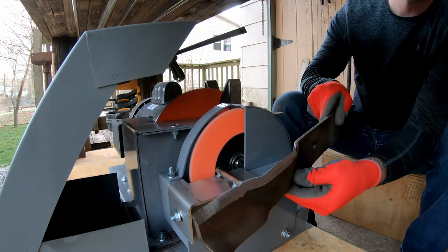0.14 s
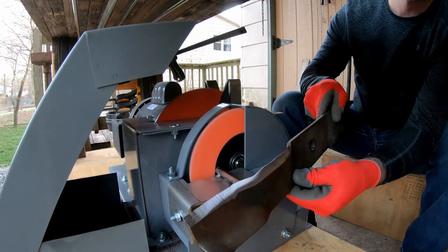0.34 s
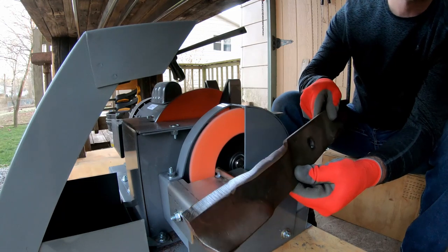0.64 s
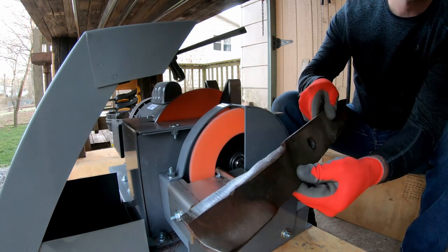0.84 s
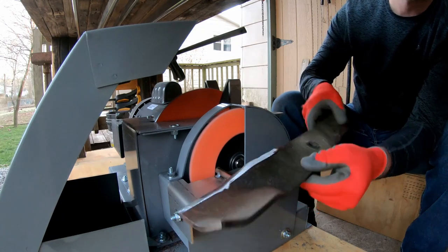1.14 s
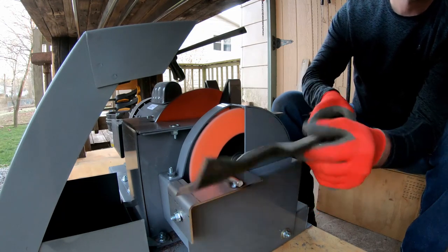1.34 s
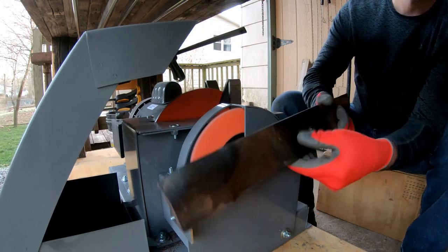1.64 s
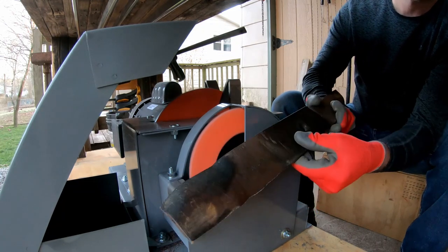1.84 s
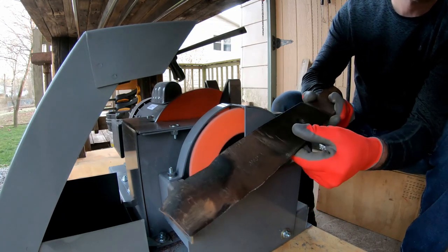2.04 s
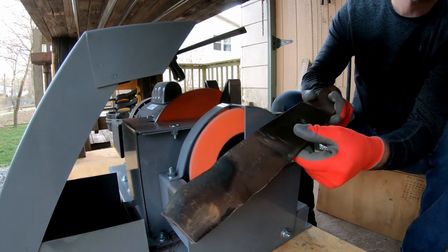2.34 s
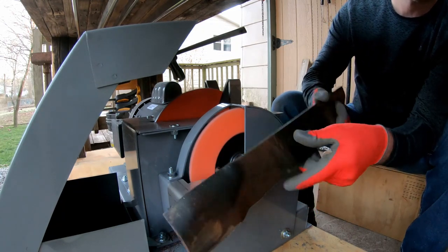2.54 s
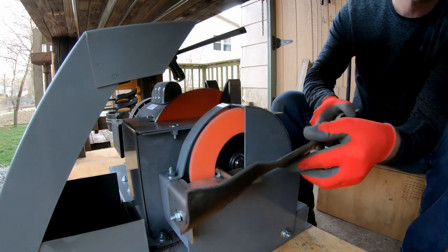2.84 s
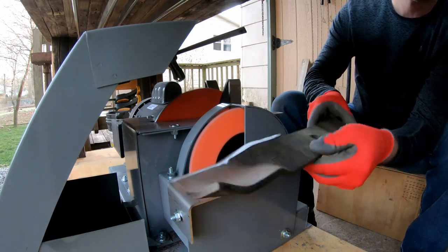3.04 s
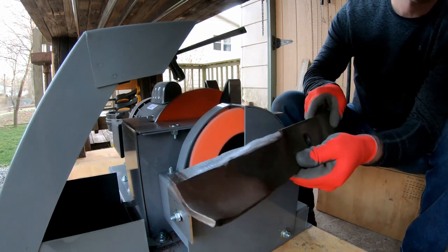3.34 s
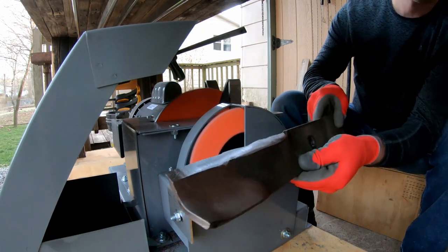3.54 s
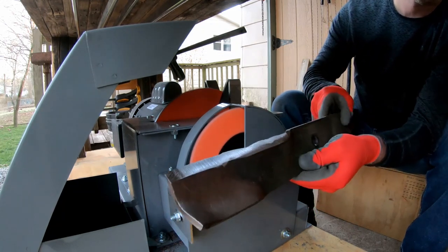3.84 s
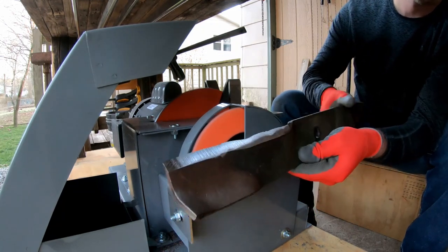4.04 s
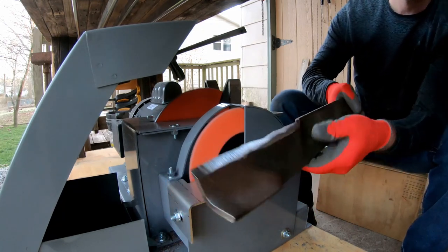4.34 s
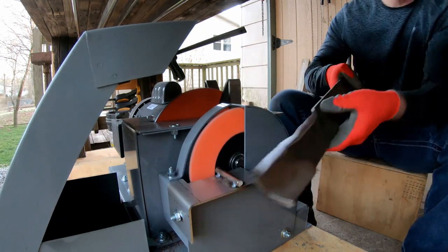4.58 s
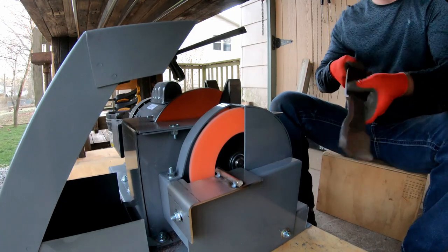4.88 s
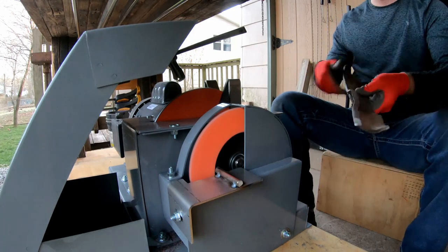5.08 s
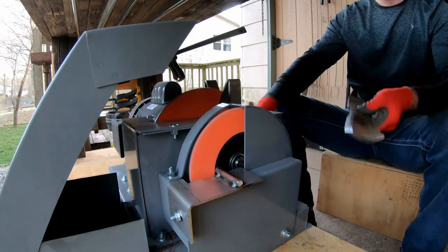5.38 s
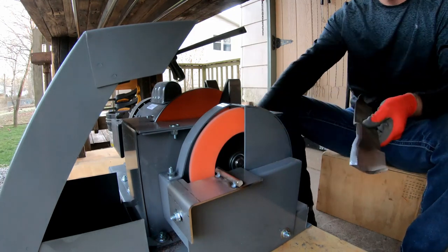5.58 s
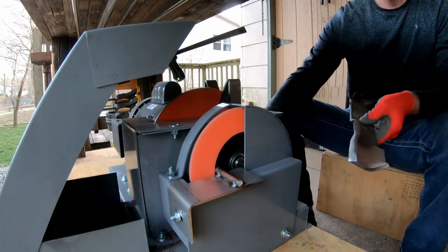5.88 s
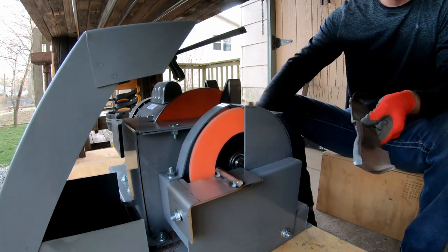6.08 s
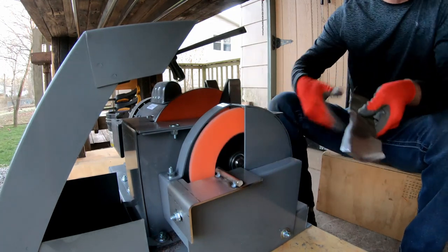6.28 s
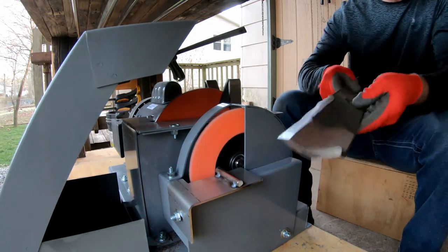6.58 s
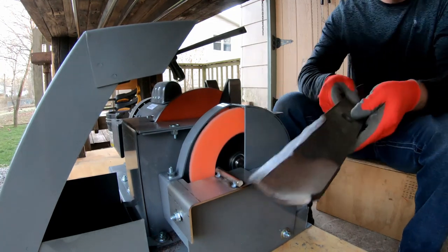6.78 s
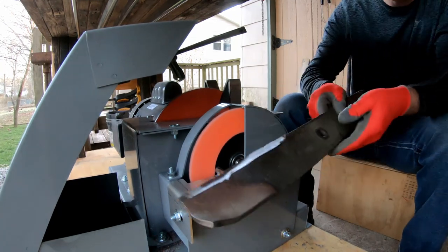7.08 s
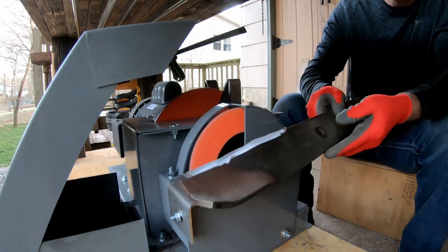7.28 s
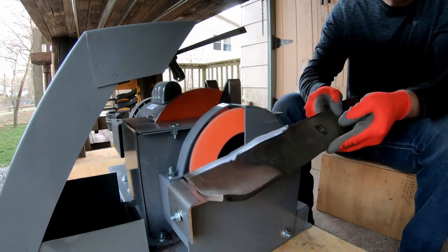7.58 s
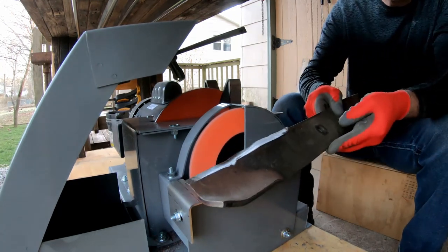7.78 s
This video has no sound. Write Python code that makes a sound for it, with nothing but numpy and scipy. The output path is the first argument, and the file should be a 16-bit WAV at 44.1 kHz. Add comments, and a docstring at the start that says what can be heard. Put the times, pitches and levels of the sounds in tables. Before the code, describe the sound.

A bench grinder idles close by under an open shed, its motor giving a steady, gently swelling hum over a soft fan whir. A loose part ticks rapidly against the metal guard. About six seconds in, a switch snaps off and the hum dies away. The wheel keeps coasting, slowing slightly, with a low shudder from the stand, louder metallic ticking and dull knocks from the housing.

```python
"""Under an open shed, a bench grinder idles close by. Its four-pole motor hums on multiples of the
shaft speed, which swell with the slip against the mains; a loose part ticks on the guard once a turn.
The switch snaps off and the hum dies. The unbalanced wheel coasts, shakes the stand and makes the
housing knock. Fan and bearings whir behind it all."""
import sys
import numpy as np
from scipy import signal
from scipy.fft import rfft, irfft
from scipy.io import wavfile
from scipy.ndimage import uniform_filter1d

SR = 44100
rng = np.random.default_rng(int(sys.argv[2]) if len(sys.argv) > 2 else 0)


def waveform_to_disk(signal):
    """Save audio, clipped to [-1, 1], as 16-bit WAV at the path in sys.argv[1]."""
    frames = np.transpose(np.atleast_2d(signal))
    scaled = np.clip(frames, -1, 1) * 32767
    samples = np.round(scaled).astype(np.int16)
    wavfile.write(sys.argv[1], SR, samples)


N = 349272
T = np.arange(N) / SR
F = np.maximum(np.arange(N // 2 + 1) * SR / N, 1)
SLIP_HZ = 0.374  # twice the mains minus four times the shaft speed
POWER_OFF_S = 5.95

# Shaft speed: t/s, speed/Hz
SHAFT_SPEED = [(0, 29.909), (5.907, 29.909), (6.38, 28.943), (7.92, 26.259)]
def shaft():
    """Shaft angle in turns: steady under power, then slowing."""
    return np.cumsum(curves(SHAFT_SPEED)[0]) / SR - 1 / 8

# Hum lines: shaft order, offset/slip steps
HUM_LINES = [(1, 0), (2, 0), (3, 0), (4, 1), (5, 1), (6, 1), (7, 1), (8, 1), (9, 1), (10, 1), (11, 1),
             (12, 1), (13, 1), (14, 3), (15, 1), (16, 3), (17, 2), (20, 4), (23, 4), (34, 4), (35, 0)]
# Swell of each hum line: level/dB, depth, loudest at t/s
HUM_SWELLS = [(-65, .17, 2.15), (-59, 0.4, 2.1), (-64.5, 1, 0.29), (-52.5, 0.1, 0.28), (-50.5, 0.21, 0.033),
              (-31, 0.07, 1.1), (-46.5, 0.6, 1.61), (-42.5, 0.54, 0.91), (-53, 1.4, 1.1),
              (-52, 0.55, 0.092), (-54.5, 0.91, 0.22), (-63.5, 1.3, 0.42), (-64, 1.2, 0.55),
              (-68, 0.4, 2.8), (-84, 0.5, 2.5), (-71.5, 0, 2.3), (-71.5, 0, 1), (-69, 1.2, 0.92),
              (-70, 0.92, 2.7), (-75.5, 0.8, 0.87), (-75.5, 1.65, 2.57)]
def motor_hum(turn, stand_hz=185, stand_width_hz=33, frame_lag_cycles=0.24, off_t60_s=0.75):
    """Each line beats with a neighbour one slip step up (two at order 10); stand and frame delay it."""
    decimation = 8
    t, turn = T[::decimation], turn[::decimation]
    out = 0
    for (order, steps), (db, depth, loud_s) in zip(HUM_LINES, HUM_SWELLS):
        hz = order * SHAFT_SPEED[0][1]
        beat_hz = SLIP_HZ * (2 if order == 10 else 1)
        swell = 1 + depth * np.exp(2j * np.pi * beat_hz * (t - loud_s))
        lag = np.arctan2(1, (stand_hz - hz) / stand_width_hz)
        lag += 2 * np.pi * frame_lag_cycles * (order % 4 > 0)  # every fourth order is magnetic pull
        phase = 2 * np.pi * (order * (turn - 0.5) + steps * SLIP_HZ * t) - lag
        out = out + through_bench(undb(db) * swell * np.exp(1j * phase), hz)
    out = signal.resample_poly(out, decimation, 1, axis=1, padtype="line")[:, :N]
    return out * undb(-60 * np.maximum(T - POWER_OFF_S, 0) / off_t60_s)

# Wheel lines: shaft order
WHEEL_ORDERS = [1, 2, 3, 5, 6, 7, 8, 9, 11]
# Each wheel line before the stand's lift: level/dB, drift/(dB/s), rise per unit shudder/dB
WHEEL_LEVELS = [(-58, -10, -8), (-54, 1.5, 1.5), (-51.5, -3, 11), (-59, 3, 10), (-51, -4.5, 1.5),
                (-58.5, 4, 8.5), (-55.5, 1, 13.5), (-58, 0, 0), (-65, 5.5, 10)]
# Stand resonances: f/Hz, width/Hz, gain/dB
STAND_RESONANCES = [(170.1, 5.6, 9.5), (253.6, 2.5, 10), (250, 2.1, 11.5), (306.1, 8.1, 10), (288, 5.3, -2)]
# Stand shudder: t/s, strength (negative = slack)
STAND_SHUDDER = [(6.55, 0.13), (6.9, 0.45), (7.08, 0.67), (7.2, 0.35), (7.32, -0.65), (7.55, -0.29)]
def coasting_wheel(turn, waver_db_per_s=1.2, onset_s=0.058):
    """The unbalanced wheel sweeps its multiples down through the stand's resonances."""
    coast = T > POWER_OFF_S
    since = T[coast] - POWER_OFF_S
    speed, shudder = curves(SHAFT_SPEED)[0][coast], curves(STAND_SHUDDER)[0][coast]
    onset = np.minimum(since / onset_s, 1)
    out = np.zeros((2, N))
    for order, (db, drift, rise_db) in zip(WHEEL_ORDERS, WHEEL_LEVELS):
        waver_db = waver_db_per_s * since * walk(9)[coast]
        size = undb(db + drift * since + rise_db * shudder + waver_db)
        size *= resonance_gain(order * speed, STAND_RESONANCES)
        line = size * np.exp(2j * np.pi * (order * turn[coast] + rng.random()))
        out[:, coast] += through_bench(line, order * SHAFT_SPEED[2][1]) * onset
    return out

# Bench path, right against left: f/Hz, gain/dB, lag/rad
BENCH_PATH = [(30, 8, -.32), (60, 0, -.48), (90, 9.5, 1.06), (120, -1.3, -.05), (150, .3, -.07),
              (180, -.6, -.04), (240, -.4, 0), (300, .8, -.04), (330, .7, 0), (420, -4.5, 0), (600, 0, -.3),
              (700, 3.3, .45), (1050, 4.5, .14)]
def through_bench(line, hz):
    """A complex line in stereo; the lowest lines reach the right side through the bench."""
    path_hz, db, lag = np.transpose(BENCH_PATH)
    right = undb(np.interp(hz, path_hz, db)) * np.exp(-1j * np.interp(hz, path_hz, lag))
    return np.sqrt(8) / (1 + right.real) * np.array([line.real, (line * right).real])

# Pressure of the loose part, repeating each slip cycle: t/s, pressure 0-1
CONTACT_PRESSURE = [(2.2, 0.46), (2.5, 0.04), (3.0, 0.47), (3.5, 0.51), (4.15, 1), (4.75, 0.88)]
# Rim, body, edge, hiss: unpressed level/dB, rise at full pressure/dB, coasting offset/dB
GUARD_LEVELS = [(-92, 22, -21), (-70.5, 9, 0), (-78, 15, 0), (-98, 17, -16)]
# Coasting contact: t/s, body level/dB, edge level/dB, length/turns
COAST_CONTACT = [(5.96, -66, -85, 0.019), (6.27, -76.5, -88, .03), (6.4, -59.5, -59.5, .018),
                 (6.55, -54, -60.5, .014), (6.9, -53, -60.5, .03), (7.15, -55, -66.5, .04),
                 (7.3, -62, -69.5, .045), (7.6, -61, -69, .055), (7.92, -59, -69, .065)]
def contact(powered_length_turns=0.033):
    """The part leans in and lets go under power. Gives dB of pip, rim, body, edge, hiss, and length."""
    pressure = np.interp(T, *np.transpose(CONTACT_PRESSURE), period=1 / SLIP_HZ)
    body_db, edge_db, length = curves(COAST_CONTACT)
    powered = T < COAST_CONTACT[0][0]
    pip_db = np.where(powered, -70.5 + 6 * slip_swell(loud_s=2.72), np.interp(T, (6.4, 6.7), (-66, -71)))
    levels = [pip_db]
    for (db, rise_db, offset_db), coast_db in zip(GUARD_LEVELS, (body_db, body_db, edge_db, edge_db)):
        levels.append(np.where(powered, db + rise_db * pressure, coast_db + offset_db))
    return levels, np.where(powered, powered_length_turns, length)

POWERED_TICK_TURNS, COAST_TICK_TURNS = -0.02, 0.51
# Housing pip and guard rim: f/Hz, t60/s
PIP_AND_RIM = [(2000, 0.049), (4217, 0.2)]
# Guard body and edge modes: f/Hz, t60/s, powered level/dB, coasting level/dB, late level/dB
BODY_MODES = [(1478, 0.048, -8.5, -0.5, 3), (1450, 0.017, -12, -12.5, 0), (1776, 0.076, -12, -13.5, -5),
              (2254, 0.094, 0, -14.5, -2), (2464, 0.035, 3, -1.5, 2.5), (2667, 0.039, 0.5, -10, -11.5),
              (3090, 0.021, -20.5, -1.5, -13.5), (3193, 0.035, 0, 4, -2), (3314, 0.022, -5.5, -4.5, 6),
              (3450, 0.034, -19.5, -9.5, -1)]
EDGE_MODES = [(4600, 0.018, -14, -16.5, -13), (4794, 0.024, -6.5, -14, -5), (5014, 0.027, -4, -6, -13),
              (5480, 0.024, -4, -12.5, -9), (5834, 0.018, -4, -12, -5), (6220, 0.0037, -1, 0.5, 2.5),
              (6310, 0.016, -6.5, -2, 1), (7060, 0.013, -3.5, -7.5, -1.5), (7700, 0.018, -9, -10.5, -6.5),
              (8560, 0.024, -13, -10, -5.5), (8970, 0.015, -4.5, -10, -15.5)]
def guard_ticks(turn, shift_s=6.3, creep_s=(7.05, 7.4)):
    """A loose part rings housing and guard once a turn; coasting, it touches elsewhere, then creeps."""
    levels, length = contact()
    angle = turn - np.where(T < shift_s, POWERED_TICK_TURNS, COAST_TICK_TURNS)
    late = np.interp(T, creep_s, [0, 1])
    hit = scrape(angle, length)

    def struck(modes):
        """Modes weighted for where the part touches."""
        out = 0
        for hz, t60, powered_db, coast_db, late_db in modes:
            db = np.where(T < shift_s, powered_db, coast_db + late * (late_db - coast_db))
            out = out + ring(hit, hz, t60) * np.sqrt(t60) * undb(db)
        return unit(out)

    hiss = bandpass([hit, scrape(angle, length)], (10000, 15200), order=3)
    hiss = undb(0.5 * late) * np.array([unit(side) for side in hiss])
    edge_rasp = bandpass([hit, 0.2 * hit + scrape(angle, length)], (1300, 9600), order=4)
    edge = struck(EDGE_MODES) + undb(-14 + 0.5 * late) * unit(edge_rasp)
    body_rasp = bandpass(scrape(angle, 2.1 * length), (1300, 3900), order=2)
    body = struck(BODY_MODES) + late * undb(-1.5) * unit(body_rasp)
    pip, rim = [ring(tap(angle + 0.0411, scatter_db=1.5), hz, t60) for hz, t60 in PIP_AND_RIM]
    # a faint touch ahead of the late ticks
    graze = ring(tap(angle + 0.214, scatter_db=1.3), hz=5480, t60=0.012, rise=0.33)
    graze *= undb(-73) * np.interp(T, (6.75, 6.9), [0, 1])
    return graze + sum(undb(db) * part for db, part in zip(levels, (pip, rim, body, edge, hiss)))

def scrape(angle, length, scatter_db=-0.5, fresh_grit=0.39):
    """One scrape a turn over much the same roughness; its energy is independent of its length."""
    angle = angle + 2.6 * length
    count, past = np.floor(angle).astype(int) + 2, angle % 1
    size = undb(scatter_db * rng.standard_normal(count.max() + 1))[count]
    surface = rng.standard_normal(1500)[(past * 1500).astype(int)]
    grit = surface + fresh_grit * rng.standard_normal(N)
    return size * grit * (past / length) ** 2 * np.exp(-past / length) / np.sqrt(length)

def tap(angle, scatter_db):
    """One clean blow a turn, of uneven strength."""
    count = np.floor(angle).astype(int) + 2
    size = undb(scatter_db * rng.standard_normal(count.max() + 1))[count]
    return size * (np.diff(count, prepend=count[0]) == 1)

# Switch contacts and bounces: t/s, relative level/dB
SWITCH_SNAPS = [(5.906, 14), (5.908, -2), (5.912, -13), (5.916, 12), (5.92, -3), (5.923, -7), (5.934, -5),
                (5.942, 0)]
# Switch box modes: f/Hz, t60/s, relative level/dB
BOX_MODES = [(990, 0.027, -12), (1320, 0.0065, 7.5), (1770, 0.0053, -12), (2190, 0.0064, 6.5),
             (2840, 0.0038, -8), (3000, 0.011, 4), (4900, .006, -23), (6900, 0.0018, -4.5),
             (8800, 0.006, -15)]
def switch(level_db=-58, decay_s=0.0067):
    """Short gritty snaps ring the switch box."""
    near = np.abs(T - SWITCH_SNAPS[0][0]) < 0.25
    t, out = T[near], np.zeros((2, N))
    envelope = sum(undb(db) * np.exp(-np.maximum(t - s, 0) / decay_s) * (t >= s)
                   for s, db in SWITCH_SNAPS)
    push = envelope * rng.standard_normal(len(t))
    out[:, near] = unit(sum(undb(db) * ring(push, hz, t60, rise=0.079) for hz, t60, db in BOX_MODES))
    return undb(level_db) * out

# Housing knock modes: f/Hz, t60/s, level at unit shudder/dB
KNOCK_MODES = [(564, .05, -60), (682, .05, -58)]
def housing_knocks(turn):
    """Dull uneven blows, one a turn, that grow with the stand's shudder."""
    blows = tap(turn - COAST_TICK_TURNS, scatter_db=2.3)
    shudder = np.clip(curves(STAND_SHUDDER)[0], 0, 1)
    return shudder * sum(undb(db) * ring(blows, hz, t60) for hz, t60, db in KNOCK_MODES)

# Stand rattle spectrum: f/Hz, relative density/dB
RATTLE_SPECTRUM = [(20, -31.5), (35, -29.5), (60, -8), (100, -2.5), (150, 4), (200, 7), (270, 4),
                   (330, -4.5), (400, -11.5), (600, -11.5), (800, -13), (1000, -57)]
def stand_rattle(powered_db=-55, coast_db=-48, shudder_db=9, waver_db=2):
    """The stand shakes loosely: low noise that follows the shudder."""
    db = np.where(T < POWER_OFF_S, powered_db, coast_db) + shudder_db * curves(STAND_SHUDDER)[0]
    return stereo_noise(over_hz(RATTLE_SPECTRUM)) * undb(db + waver_db * walk(10))

# Fan and bearing spectrum: f/Hz, relative density/dB
WHIR_SPECTRUM = [(210, -38), (350, -6.5), (470, -17.5), (690, -11), (890, -15.5), (1160, -14),
                 (1580, -13.5), (1710, -22.5), (2000, -18), (2400, -23), (5000, -31.5), (9400, -39.5),
                 (10500, -56), (15000, -83.5)]
# Housing resonances: f/Hz, width/Hz, gain/dB
HOUSING_RESONANCES = [(603, 120, 2), (666, 24, -7), (968, 27, 4.5), (1014, 72, 2.5), (1053.5, 12, 12.5),
                      (1608, 4, 10), (1960, 22, -2.5), (3840, 160, 1.5)]
def fan_whir(turn, waver_db=1.07):
    """Air and bearing noise, lifted at the housing's resonances and throbbing with the turn."""
    spectrum_db = over_hz(WHIR_SPECTRUM) + 20 * np.log10(resonance_gain(F, HOUSING_RESONANCES))
    powered_db = -55 + 0.75 * slip_swell(loud_s=2.62)
    coast_db = -57 + 3 * curves(STAND_SHUDDER)[0]
    db = np.where(T < POWER_OFF_S, powered_db, coast_db)
    throb = 1 + 0.16 * np.cos(2 * np.pi * (turn - 0.1))
    return stereo_noise(spectrum_db) * throb * undb(db + waver_db * walk(8.8))

# Left-right coherence: f/Hz, coherence 0-1
COHERENCE = [(20, .95), (45, .95), (80, .7), (150, 1), (330, .95), (600, .68), (1200, .3), (2200, .85),
             (5000, .6), (9000, .2)]
def stereo_noise(spectrum_db):
    """Coloured noise, partly alike left and right."""
    alike = over_hz(COHERENCE)
    mid, side = rfft(rng.standard_normal((2, N)))
    mid, side = mid * np.sqrt(1 + alike), side * np.sqrt(1 - alike)
    return unit(irfft(undb(spectrum_db) * np.array([mid + side, mid - side]), N))

def shed(x, t60_s=0.17, wet_db=-11):
    """Reflections from roof and wall, different on each side."""
    t = T[:int(0.25 * SR)]
    tail = rng.standard_normal((2, len(t))) * undb(-60 * t / t60_s) * (t > 0.004)
    tail /= np.sqrt(np.sum(tail[0] ** 2))
    return x + undb(wet_db) * signal.fftconvolve(x, tail, axes=1)[:, :N]

def ring(x, hz, t60, rise=0.047):
    """One mode building up over a share of its decay; higher modes differ more in phase between sides."""
    poles = np.exp(2j * np.pi * hz / SR - np.log(1000) / (t60 * SR * np.array([1, rise])))
    mode = signal.lfilter([1], np.poly(poles), x)
    apart_rad = rng.choice([-1, 1]) * min((hz / 6000) ** 2, 1.7)
    return unit(np.array([mode.imag, (mode * np.exp(1j * apart_rad)).imag]))

def resonance_gain(hz, resonances):
    """Unity plus a peak at each resonance."""
    return 1 + sum(undb(db) / (1 + (2 * (hz - centre) / width) ** 2) for centre, width, db in resonances)

def slip_swell(loud_s):
    """Rises and falls once a slip cycle, -1 to 1."""
    return np.cos(2 * np.pi * SLIP_HZ * (T - loud_s))

def walk(rate_hz):
    """Random steps smoothed twice; rms 1."""
    hold = int(SR / rate_hz)
    steps = np.repeat(rng.standard_normal(N // hold + 1), hold)
    return unit(uniform_filter1d(uniform_filter1d(steps, hold), hold)[:N])

def curves(table):
    """Columns of a table as functions of time."""
    times, *columns = np.transpose(table)
    return [np.interp(T, times, column) for column in columns]

def over_hz(points):
    """Points joined on a log-frequency axis."""
    hz, value = np.transpose(points)
    return np.interp(np.log(F), np.log(hz), value)

def bandpass(x, band_hz, order):
    return signal.sosfilt(signal.butter(order, band_hz, "band", fs=SR, output="sos"), x)

def undb(db):
    return 10 ** (np.asarray(db) / 20)

def unit(x):
    return x / np.sqrt(np.mean(x ** 2))

def scene():
    """Tones and noise arrive directly; ticks, knocks and switch also reflect in the shed."""
    turn = shaft()
    drone = motor_hum(turn) + coasting_wheel(turn) + stand_rattle() + fan_whir(turn)
    return drone + shed(guard_ticks(turn) + housing_knocks(turn) + switch())

def record(dry, right_db=1, narrow_s=(6.7, 7.04), narrow_below_hz=4640, top_hz=15700):
    """The right side is slightly louder; late on, all but the treble draws to the centre; the top is cut."""
    x = dry * undb([[0], [right_db]])
    lowpass = signal.butter(4, narrow_below_hz, fs=SR, output="sos")
    low_side = signal.sosfiltfilt(lowpass, x[0] - x[1]) / 2
    x = x - np.interp(T, narrow_s, [0, 0.98]) * low_side * np.array([[1], [-1]])
    return signal.sosfilt(signal.ellip(10, 0.2, 80, top_hz, fs=SR, output="sos"), x)

dry = scene()
out = record(dry)
waveform_to_disk(out)
```